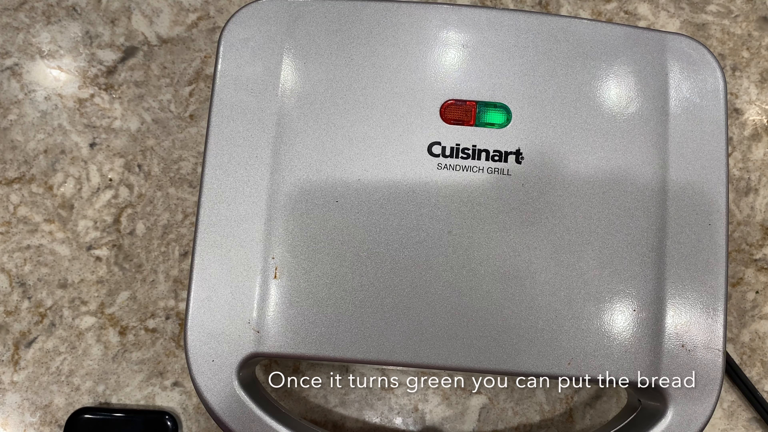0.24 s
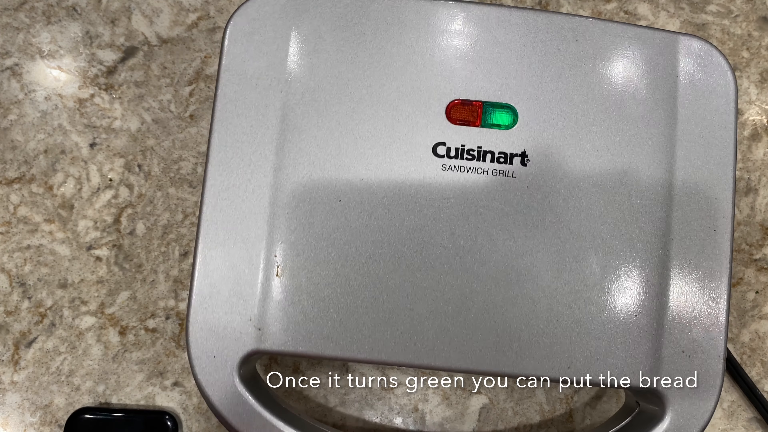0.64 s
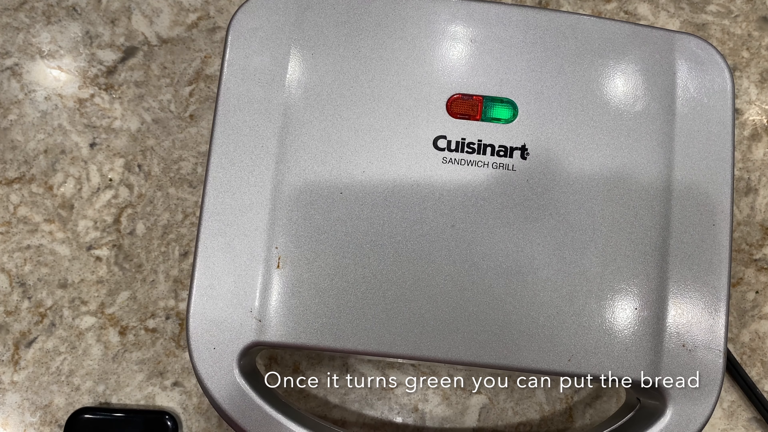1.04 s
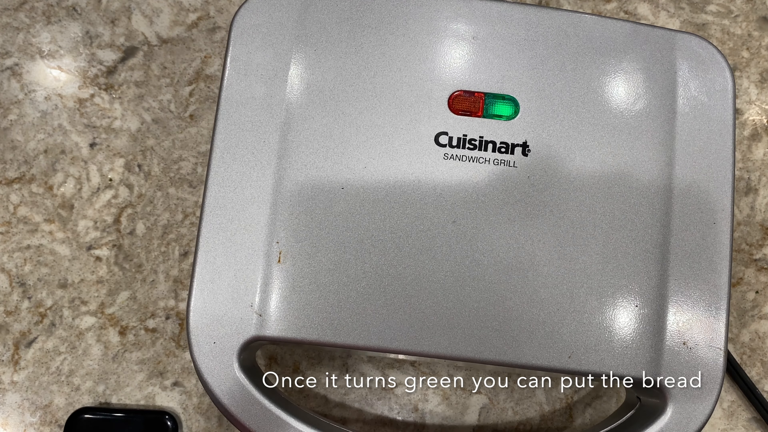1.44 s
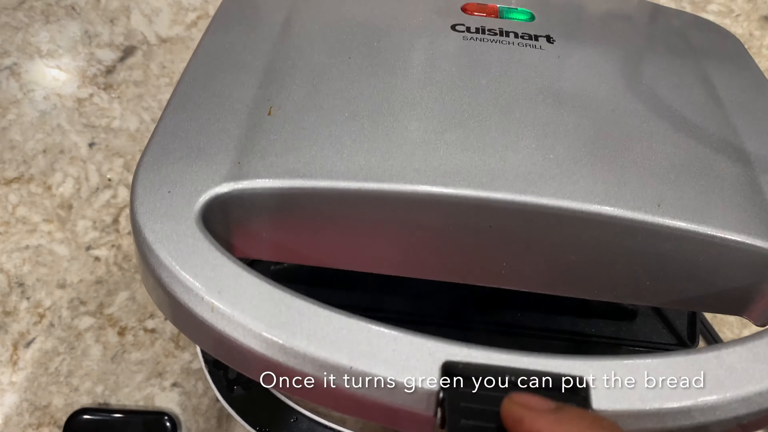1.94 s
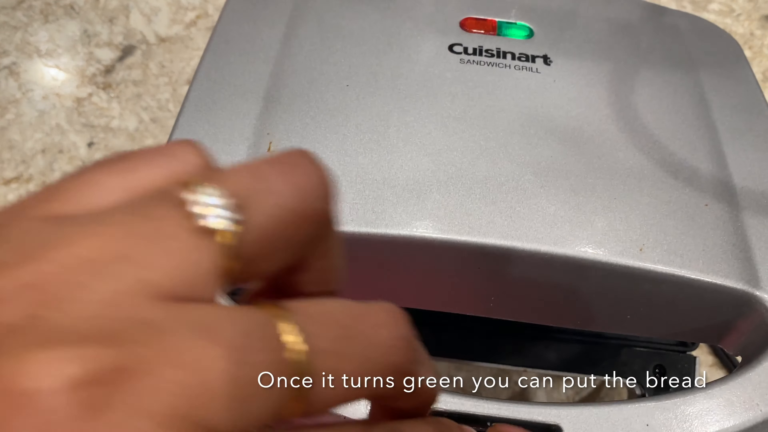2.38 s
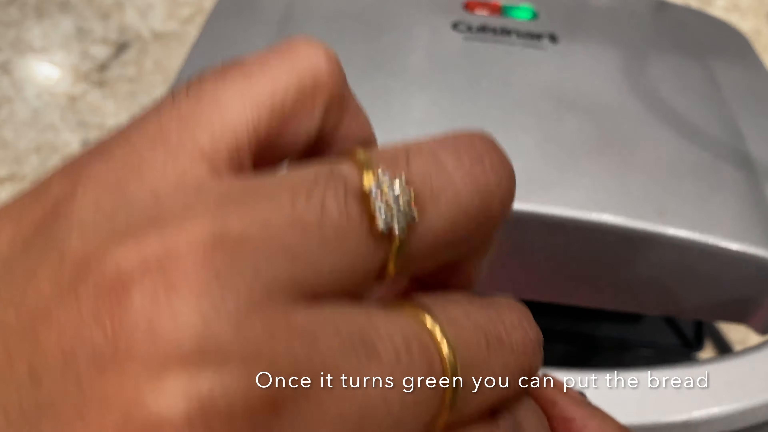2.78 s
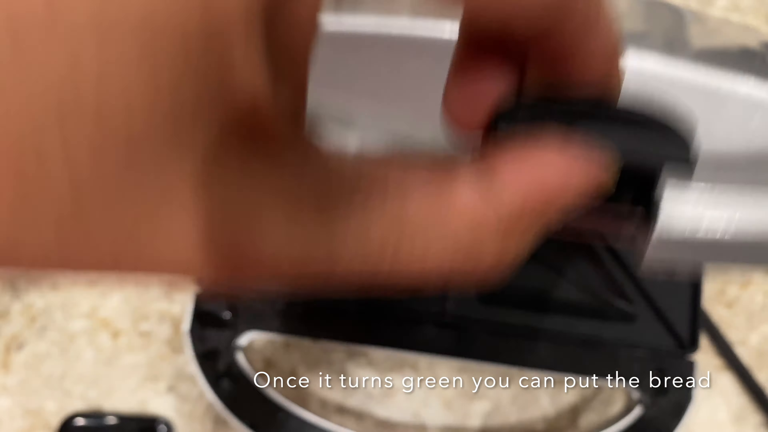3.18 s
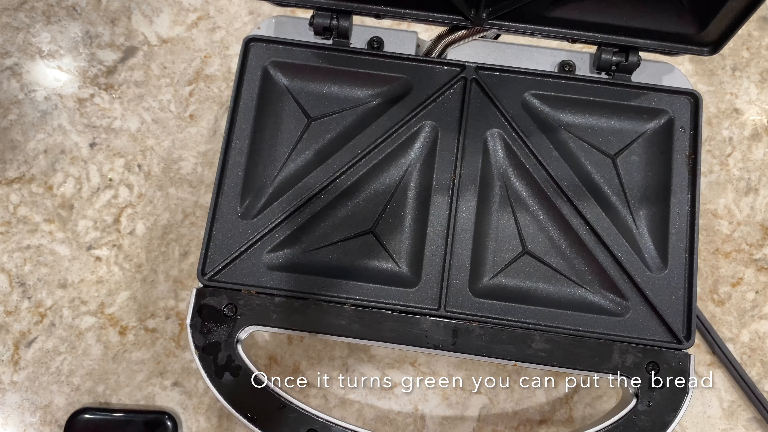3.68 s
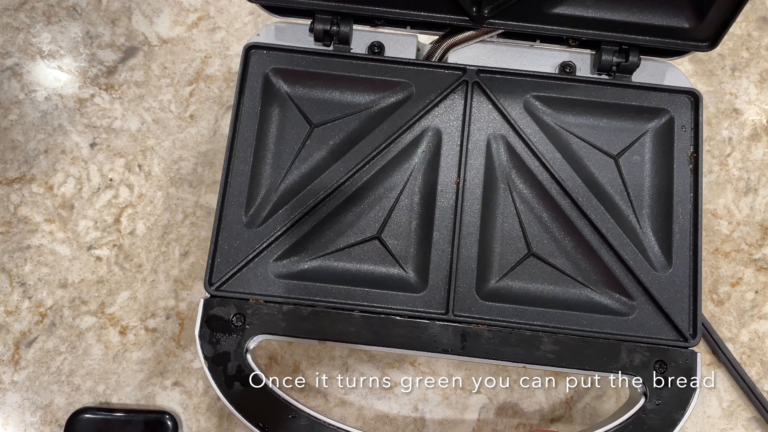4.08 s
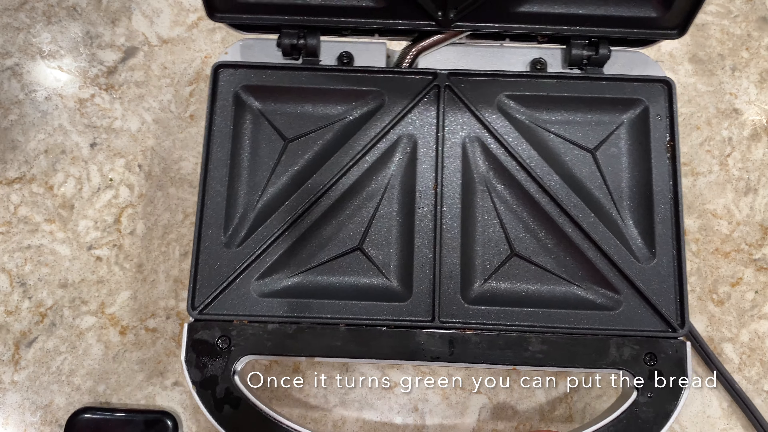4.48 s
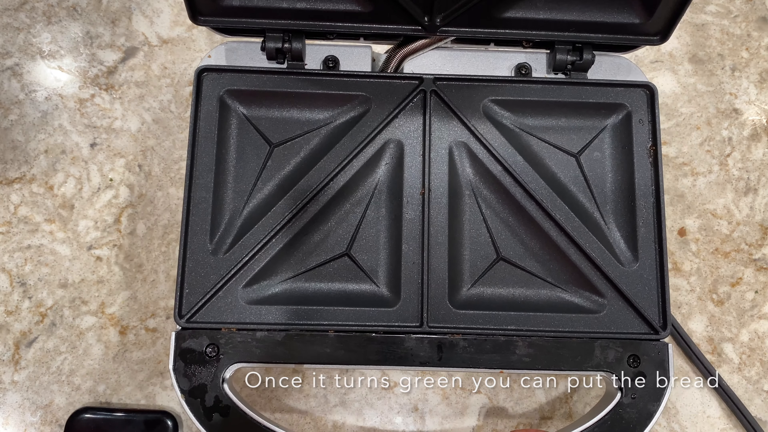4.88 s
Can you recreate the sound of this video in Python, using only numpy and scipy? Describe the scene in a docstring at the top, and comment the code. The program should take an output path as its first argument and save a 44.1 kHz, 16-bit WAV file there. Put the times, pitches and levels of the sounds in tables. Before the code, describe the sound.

Close stereo view of a sandwich grill on a stone counter in a small, hard kitchen. Quiet room noise and a low wavering hum, a couple of light rattles, then at half a second one loud, sharp plastic latch snap. The loose lid rattles for about a second. Faint hand brushing follows, then hinge and housing knocks with a soft thud as the lid opens and settles.

```python
"""Quiet room noise with a low wavering hum comes first, then finger scuffs and light rattles of a grill's lid.
The plastic latch of this sandwich grill snaps open on a stone counter, and the lid rattles on in its catch.
Then the lid is lifted, and its hinges and housing knock as it settles upright; a hand and sleeve brush past.
Blows are sums of fading tones plus noise bursts; rubbing and room noise are shaped noise.
Nearby surfaces echo the rattles and knocks, and a small hard kitchen rings behind it all."""
import sys
import numpy as np
from scipy import signal
from scipy.fft import rfft, irfft, next_fast_len
from scipy.io import wavfile
from scipy.ndimage import map_coordinates

SR = 44100
rng = np.random.default_rng(int(sys.argv[2]) if len(sys.argv) > 2 else 0)


def transcribe(signal):
    """Save signal, clipped to [-1, 1], as a 16-bit WAV file at the path in sys.argv[1]."""
    frames = np.atleast_2d(signal).T
    limited = np.clip(frames, -1, 1)
    pcm = np.round(limited * 32767).astype(np.int16)
    wavfile.write(sys.argv[1], SR, pcm)


N = 226094
T = np.arange(SR // 2) / SR  # half a second of time, for single sounds

# In these tables, t60/s is the time a sound takes to fade by 60 dB. Levels of tones and colours are relative.
# room noise over time: [t/s, level/dB]
AIR_LEVEL = [(0.0, -63.5), (0.2, -67), (0.45, -68), (0.7, -62), (1.76, -62), (3.11, -61.5), (3.77, -59.5),
             (4.44, -61.5), (5.13, -60.5)]
# how the room noise is spread over pitch: [f/Hz, level/dB]
AIR_COLOUR = [(20, -36), (50, -8.5), (100, -11.5), (165, -3), (250, -10.5), (400, -17.5), (700, -18),
              (1100, -31), (2000, -39), (3500, -44.5), (7000, -48), (13000, -54.5)]
# how alike left and right are in spread-out sound: [f/Hz, likeness from -1 to 1]
LEFT_RIGHT_LIKENESS = [(100, 0.99), (300, .85), (700, 0.31), (2000, .2), (7000, -0.098), (13000, -.6)]
# fingers scuffing the lid and handle: [start t/s, level/dB, length/s, centre f/Hz]
SCUFFS = [(.02, -72.5, 0.086, 1340), (1.841, -58.5, 0.076, 4800), (2.51, -71, .12, 1800),
          (2.661, -74, 0.073, 1895), (2.919, -75, 0.064, 1587), (3.039, -68, 0.077, 4390),
          (3.188, -73.5, .12, 1897), (3.837, -67.5, 0.028, 1403), (3.884, -73, .022, 1500),
          (5.085, -73, .07, 1193)]
# lid rattling in its catch: [t/s, level/dB, low edge f/Hz, brightness/dB per octave, panel f/Hz, panel level/dB]
RATTLES = [(.253, -51, 510, -9.5, 485, -41.5), (.447, -42, 650, -7, 547, -46.5),
           (.529, -32, 520, 1, 510, -44), (.551, -40, 800, -6, 520, -53), (.563, -37, 700, -9, 610, -35),
           (.605, -34.5, 950, -21, 493, -41.5), (.658, -33.5, 890, -19, 499, -36.5),
           (.692, -52, 910, -8, 530, -62), (.751, -46.5, 626, -5, 503, -54.5),
           (.793, -59, 630, 3, 517, -54), (.836, -54.5, 590, 1, 516, -50.5),
           (.857, -44.5, 700, 1, 527, -49), (.863, -34.5, 682, 1, 537, -46),
           (.99, -60.5, 652, -10, 605, -50.5), (1.057, -39.5, 674, -2, 458, -48),
           (1.099, -42.5, 716, -2, 496, -52), (1.137, -48, 630, -7.5, 522, -53),
           (1.226, -40.5, 594, -9, 481, -37), (1.273, -49.5, 560, -11, 493, -51),
           (1.293, -41.5, 760, 4, 529, -36.5), (1.305, -45.5, 566, -2, 529, -40),
           (1.331, -39, 900, -9, 458.6, -37), (1.366, -46.5, 582, -2, 506, -43),
           (1.517, -37.5, 752.5, -1.5, 452, -27.5), (1.58, -55.5, 720, -3.5, 473, -43)]
# tones of the closed shell: [f/Hz, level/dB, t60/s]
SHELL_TONES = [(680, -2, .045), (962, 0, .04), (1130, -5, .03), (1545, -9, .035), (1810, -11, .03),
               (2085, -7, .035), (2400, -17, .024), (3020, -19, .05)]
# noisy edge of each rattle and knock: [f/Hz, level/dB]
CONTACT_COLOUR = [(150, 6.5), (600, 13.0), (2000, 10.0), (2600, 4.5),
                  (4500, -6.5), (7000, -6.5), (9000, -10), (14000, -18.5)]
# strokes of hand and sleeve: [t/s at the height, hiss level/dB, dull rub over the hiss/dB, length/s]
STROKES = [(0.341, -82.5, -3, 0.17), (0.869, -69.5, 19.5, 0.041), (.928, -64, 10, 0.017),
           (1.1, -68.5, 6.5, 0.088), (1.273, -68.5, 1, 0.084), (1.682, -77.5, -1, 0.14),
           (1.875, -56, -17, 0.072), (2.37, -78.5, 9.5, 0.048), (2.527, -77, 8, 0.17),
           (2.699, -74, 6.5, 0.05), (2.914, -74.5, 2.5, 0.023), (3.068, -69, -6, 0.036),
           (3.12, -70.5, 2.5, 0.15), (3.562, -78, -12, 0.098), (3.886, -76.5, -0.5, 0.053),
           (3.975, -69, -24, 0.063), (4.738, -73, -23, 0.13), (4.943, -88, 10, 0.015),
           (5.037, -89, 15, 0.019)]
# colour of the dull rub: [f/Hz, level/dB]
RUB_COLOUR = [(300, 7.5), (700, 9.5), (1300, 7), (1750, 15), (2400, 2), (3100, -1), (4500, -25.5),
              (9000, -11.5)]
# colour of the hiss: [f/Hz, level/dB]
HISS_COLOUR = [(1200, -19), (2500, -5), (3700, -4), (4100, 0), (5000, -6.5), (6400, 0.5), (8000, -5),
               (10000, -3.5), (12400, -8), (13500, -13.5)]
# small dry ticks of plastic: [t/s, level/dB]
TICKS = [(0.4988, -29), (.864, -65), (1.292, -56), (1.7953, -40.5), (2.1296, -62.5), (2.915, -67),
         (3.4617, -50), (3.6589, -41), (4.952, -59)]
# colour of a tick: [f/Hz, level/dB]
TICK_COLOUR = [(1000, -15), (3000, -14.5), (7000, -5.5), (12000, -5.5), (15000, -1.5)]
# catch snapping free, then the lid jumping against it: [t/s, level/dB, lowest f/Hz, highest f/Hz, free ring/s]
SNAPS = [(0.499, -3.5, 648, 14800, .0083), (0.5053, -2.5, 359.5, 1133, .0011)]
# tones of the latch and handle, before the choke: [f/Hz, level/dB, t60/s]
LATCH_TONES = [(482, 4.3, .065), (631, -3, .044), (889, -9.5, .03), (1005, -4, .036), (1116, -.5, .031),
               (1425, -10.5, .04), (1720, -9.5, .03), (2095, 1.5, .045), (2215, -4.5, .022),
               (2400, -7, .026), (2859, -20, .018), (3560, -9.5, .026), (3950, -8, .016), (6100, -16, .02)]
# the latch's crack: [f/Hz, level/dB]
LATCH_CRACK_COLOUR = [(300, -26.5), (900, -7), (2500, -0.5), (4000, -7.5), (5000, -11), (7000, -6),
                      (10000, -18), (14000, -15)]
# the snap as it spreads into the room: [f/Hz, level/dB]
BURST_COLOUR = [(200, -20.5), (330, -16), (480, 3.5), (1100, 4.5), (1800, .5), (3300, -6.5), (4800, -17),
                (6500, -17), (9000, -23.5), (13000, -38.5)]
# dull bumps of the grill's weight on the counter: [t/s, level/dB, pitch as a share of the usual]
BUMPS = [(0.5, -34.5, 1.86), (0.503, -32, 0.59), (1.883, -45, 0.53), (3.098, -39, 0.79), (3.523, -27, 1),
         (3.94, -41, 0.64), (4.311, -42, 0.84), (4.724, -35.5, 0.98)]
# tones of the grill on its feet: [f/Hz at the usual pitch, level/dB, t60/s]
FEET_TONES = [(79, -12.5, 0.23), (130, 4, 0.051), (210, -5, .07), (296, -9.5, 0.057)]
# jolts that reach the metal cooking plate: [t/s, level/dB]
JOLTS = [(.501, -44.5), (0.862, -59), (1.52, -64), (2.434, -73), (3.928, -67)]
# tones of the plate: [f/Hz, level/dB, t60/s]
PLATE_TONES = [(1534, -12, .14), (1814, -14, .12), (2907, -1, .17), (2985, -4, .26), (3100, -7, .14),
               (3540, -6, .18), (3890, -11, .15)]
# loose parts chattering after a jolt: [t/s, level/dB, length/s]
CHATTER = [(0.514, -32.5, 0.22), (0.87, -49, 0.12), (1.266, -47.5, 0.17), (2.508, -66, 0.18),
           (3.849, -60.5, 0.078)]
# gritty noise of one chatter touch: [f/Hz, level/dB]
GRIT_COLOUR = [(200, -22.5), (450, 4.5), (1100, 7), (2200, -3.5), (4000, -9), (7000, -18.5), (13000, -36.5)]
# hinge and housing knocks: [t/s, level/dB, low edge f/Hz, brightness/dB per octave, panel f/Hz, panel level/dB]
KNOCKS = [(2.074, -61, 942, -1.5, 460, -63.5), (2.281, -66, 509.3, -4.5, 451.7, -59.5),
          (2.376, -62, 600, -11, 459.3, -55.5), (2.435, -46.5, 755, 2.5, 462, -50.5),
          (2.511, -59.5, 967, -4, 466.4, -66), (2.566, -51, 835, -1.5, 470, -46.5),
          (2.715, -62.5, 600, 0.5, 457.6, -52.5), (3.36, -47, 519, -1.5, 565, -40),
          (3.516, -57, 1096, -4, 300.3, -59), (3.754, -66, 467, -11, 480, -44.5),
          (3.776, -64, 603, -8.5, 481, -53), (3.828, -44, 519, -10, 483, -34.5),
          (3.929, -41, 620, -1, 441, -36), (3.971, -42, 474, -6, 293, -34.5),
          (4.022, -47.5, 920, -10, 353, -61), (4.685, -39.5, 606, -1.5, 275, -40),
          (4.732, -43.5, 1237, -12, 454, -47.5), (4.937, -48.5, 720, -15, 322.5, -52.5),
          (5.039, -46, 787, -18.5, 300, -51)]
# tones of the open housing: [f/Hz, level/dB, t60/s]
HOUSING_TONES = [(610, -6, .02), (738, 1, .034), (1090, -5, .022), (1300, -9, .014), (1525, -2, .022),
                 (1770, -7, .018), (2100, -16, .016), (2440, -19, .016), (2830, -16, .032)]
# echoes off the counter and nearby surfaces: [delay t/s, level/dB]
ECHOES = [(.0038, -17), (0.0126, -15.5), (0.0171, -22.5), (.029, -27)]
# how long the kitchen rings at each pitch: [f/Hz, t60/s]
KITCHEN_T60 = [(60, 1), (200, 0.53), (600, 0.38), (2000, 0.81), (4000, 0.38), (8000, 0.44), (14000, 0.17)]
# how loudly the kitchen answers: [f/Hz, level/dB]
KITCHEN_LEVEL = [(60, -10.5), (300, -5.5), (700, -12), (2000, -17), (4000, -4.5), (12000, -15)]
# the two microphone ports are shaded differently: [f/Hz, left minus right/dB]
PORT_SHADE = [(60, -1), (110, 0), (200, 0.5), (330, -0.8), (500, 1.4), (660, 3.5), (1210, 1), (2210, -1.5),
              (4020, -5), (7330, 0), (13400, 1.5)]

HUM_HZ, HUM_DB = 156, -2.5  # an appliance's tone; its level goes with the room noise
SLIPS_PER_S, SCUFF_Q = 2500, 1.1  # how densely skin catches; how narrow the rubbed part's resonance is
CONTACT_Q, BRIGHT_FROM_HZ = 1.2, 990  # how sharply a contact picks its ring; where hardness starts to count
PANEL_DELAY_S, PANEL_ATTACK_S = .002, 0.00053  # the broad panel starts to swing after the contact
PANEL_FREE_S, PANEL_DAMP_DB = .026, -9  # the panel swings freely, then is damped
RISE_SHARE = 0.43  # the part of a stroke spent swelling
GRIP_DB, GRIP_KNOTS_PER_S = 3.8, 120  # depth and rate of catching and slipping in the rub
GRAIN_DB, GRAIN_KNOTS_PER_S = 3.6, 130  # the same in the hiss
SNAP_ATTACK_S = 0.00051  # the catch takes a moment to slide off its lip
SEAT_DB = -12.5  # the handle lands on its seat soon after each blow, which chokes its ring
SHUDDER_HZ, SHUDDER_RELATIVE_DB, SHUDDER_S = 54, -53.5, 0.24  # the grill keeps rocking after the snap
CHATTER_FADE_DB, CHATTER_SPREAD_DB = 22, 10  # loss over one bout; range of sizes
CHATTER_RING_DB = -5  # the shell under the grit
TOP_HZ = 14000


def amp(db):
    """Turn decibels into a gain."""
    return 10 ** (np.asarray(db) / 20)


def unit(x):
    """Scale to an average strength (rms) of 1."""
    return x / np.sqrt(np.mean(x ** 2) + 1e-20)


def along(points, hz):
    """Read values between (Hz, value) points on a log pitch axis."""
    f, v = np.transpose(points)
    return np.interp(np.log(hz + 1), np.log(f), v)


def curve(rows, **ends):
    """Turn (s, value) rows into one value per sample."""
    return np.interp(np.arange(N) / SR, *np.transpose(rows), **ends)


def wobble(rate):
    """A smooth random curve with rate random points a second."""
    knots = rng.standard_normal(int(N * rate / SR) + 4)
    return map_coordinates(knots, [np.arange(N) * rate / SR])


def filtered(x, response):
    """Change the strength and timing of each pitch in x by a response to frequency."""
    n = x.shape[-1]
    m = next_fast_len(n + 8192)  # room for the tail
    return irfft(rfft(x, m) * response(np.fft.rfftfreq(m, 1 / SR)), m)[..., :n]


def add(track, s, sound):
    """Mix a sound in at time s."""
    part = track[round(s * SR):][:len(sound)]
    part += sound[:len(part)]


def spread(hz):
    """Shares of middle and side sound that give the wanted left-right likeness."""
    turn = np.arccos(np.clip(along(LEFT_RIGHT_LIKENESS, hz), -1, 1)) / 2
    return np.array([np.cos(turn), np.sin(turn)])


def noise(colour):
    """Spread-out stereo noise of rms 1."""
    raw = rng.standard_normal((2, N))
    mid, side = filtered(raw, lambda hz: amp(along(colour, hz)) * spread(hz))
    return unit(np.array([mid + side, mid - side]))


def ring(tones, scatter_db, detune):
    """A struck part sounds as fading tones, with strengths and pitches a little different each time."""
    out = np.zeros(len(T))
    for hz, db, t60 in tones:
        level_chance, pitch_chance = rng.standard_normal(2)
        fade = amp(db + scatter_db * level_chance - 60 * T / t60)
        out += fade * np.sin(2 * np.pi * hz * (1 + detune * pitch_chance) * T)
    return out


def crack(colour, t60):
    """A burst of fading noise stands for countless short-lived tones."""
    burst_noise = unit(filtered(rng.standard_normal(len(T)), lambda hz: amp(along(colour, hz))))
    return burst_noise * amp(-60 * T / t60)


def radiated(x, cut_hz):
    """Small parts give off little bass."""
    return filtered(x, lambda hz: (1j * hz) ** 2 / (cut_hz ** 2 - hz ** 2 + 1j * hz * cut_hz))


def dispersed(x, delay, knee_hz):
    """The bass trails the treble by up to delay seconds, so each click drops in pitch."""
    return filtered(x, lambda hz: np.exp(-2j * np.pi * delay * knee_hz * np.arctan(hz / knee_hz)))


def background():
    """Low room noise drifts in level under a wavering appliance hum."""
    phase = 2 * np.pi * HUM_HZ * np.arange(N) / SR + .5 * wobble(5)
    hum = np.sin(phase) * amp(2 * wobble(5))
    air = amp(.8 * wobble(9)) * noise(AIR_COLOUR)
    return amp(curve(AIR_LEVEL)) * (air + amp(HUM_DB) * hum)


def scuffs():
    """Fingers drag on the lid: a swell of tiny slips, pitched by the part that they rub."""
    out = np.zeros(N)
    for s, db, length, centre_hz in SCUFFS:
        slips = rng.standard_normal(len(T)) * (rng.random(len(T)) < SLIPS_PER_S / SR)

        def resonance(hz):
            through = 1j * hz * centre_hz
            return (through / (SCUFF_Q * (centre_hz ** 2 - hz ** 2) + through)) ** 2

        rubbed = unit(filtered(slips, resonance))
        swell = np.sin(np.pi * np.clip(T / length, 0, 1))
        add(out, s, amp(db) * rubbed * swell)
    return out


def voiced(blow, db, ring_hz, brightness_db, span):
    """The point of contact picks the low ring, its hardness the treble; db is the rms over span seconds."""
    def contact(hz):
        picked = (1j * hz) ** 2 / (ring_hz ** 2 - hz ** 2 + 1j * hz * ring_hz / CONTACT_Q)
        octaves = np.log2(np.clip(hz, BRIGHT_FROM_HZ, 7000) / BRIGHT_FROM_HZ)
        return picked * amp(brightness_db * octaves)

    blow = filtered(blow, contact)
    return amp(db) * blow * np.sqrt(span * SR) / np.linalg.norm(blow)


def contacts(events, tones, crack_db, crack_t60, delay, span, lead, detune, scatter_db, panel_t60):
    """Light blows of plastic ring the same tones at new strengths, over a hollow panel note that shifts."""
    out = np.zeros(N)
    attack = 1 - np.exp(-T / .0006)
    swing = (1 - np.exp(-T / PANEL_ATTACK_S)) * amp(-60 * T / panel_t60)
    swing *= amp(PANEL_DAMP_DB * np.clip((T - PANEL_FREE_S) / .006 + .5, 0, 1))
    for s, db, ring_hz, brightness_db, panel_hz, panel_db in events:
        edge = crack(CONTACT_COLOUR, crack_t60)
        blow = (ring(tones, scatter_db, detune) + amp(crack_db) * edge) * attack
        blow = dispersed(radiated(blow, cut_hz=170), delay, knee_hz=900)
        # start early by lead seconds, as the lower pitches come late
        add(out, s - lead, voiced(blow, db, ring_hz, brightness_db, span))
        panel = swing * np.sin(2 * np.pi * panel_hz * T)
        add(out, s + PANEL_DELAY_S, amp(panel_db) * panel)
    return out


def rattles():
    """The loose lid taps in its catch and rings the closed shell."""
    return contacts(RATTLES, SHELL_TONES, crack_db=3, crack_t60=0.033, delay=0.003, span=0.008,
                    lead=0.00087, detune=0.012, scatter_db=2.5, panel_t60=.08)


def brushing():
    """Skin and cloth slide in uneven strokes that swell quickly and trail away."""
    t = np.arange(N) / SR
    power = np.zeros((2, N))  # the rub, then the hiss
    for s, hiss_db, rub_db, length in STROKES:
        rise, fall = RISE_SHARE * length, (1 - RISE_SHARE) * length
        distance = np.where(t < s, (s - t) / rise, (t - s) / fall)
        power += amp([[hiss_db + rub_db], [hiss_db]]) ** 2 * np.exp(-2 * distance ** 2)
    rub, hiss = np.sqrt(power)
    grip = amp(GRIP_DB * wobble(GRIP_KNOTS_PER_S))
    grain = amp(GRAIN_DB * wobble(GRAIN_KNOTS_PER_S))
    return rub * grip * noise(RUB_COLOUR) + hiss * grain * amp(3.5) * noise(HISS_COLOUR)


def ticks():
    """Tiny slips of plastic are too brief to ring the shell."""
    out = np.zeros(N)
    for s, db in TICKS:
        add(out, s, amp(db) * crack(TICK_COLOUR, t60=0.028))
    return out


def latch():
    """The catch slips off its lip: the handle rings under a sharp crack, then clunks onto its seat."""
    out = np.zeros(N)
    attack = 1 - np.exp(-T / SNAP_ATTACK_S)
    for s, db, low_hz, high_hz, free_s in SNAPS:
        choke = amp(SEAT_DB * np.clip((T - free_s) / .002 + .5, 0, 1))
        handle = choke * ring(LATCH_TONES, scatter_db=1, detune=0.0027)
        blow = amp(-7.0) * handle + amp(-13.5) * crack(LATCH_CRACK_COLOUR, t60=0.033)
        blow = radiated(attack * blow, low_hz)
        # the softer the contact, the less treble it wakes
        blow = filtered(blow, lambda hz: (1 + (hz / high_hz) ** 8) ** -.5)
        add(out, s, amp(db) * blow)
    return dispersed(radiated(out, cut_hz=660), delay=0.0086, knee_hz=577)


def burst():
    """The whole lid passes the snap on to the room as one short push."""
    push = np.zeros(N)
    push[round(SNAPS[0][0] * SR)] = 1
    push = filtered(push, lambda hz: amp(along(BURST_COLOUR, hz)))
    return amp(10.5) * push / np.linalg.norm(push)


def bumps():
    """Soft, heavy contacts give only a low thud; the snap also leaves the grill rocking."""
    out = np.zeros(N)
    attack = 1 - np.exp(-T / 0.0025)
    for s, db, pitch in BUMPS:
        tones = np.array(FEET_TONES) * [pitch, 1, 1]
        add(out, s, amp(db) * attack * ring(tones, scatter_db=0.85, detune=0.0067))
    rocking = np.sin(2 * np.pi * SHUDDER_HZ * T) * np.exp(-(T / SHUDDER_S) ** 6)
    add(out, SNAPS[0][0], amp(SHUDDER_RELATIVE_DB) * attack * rocking)
    return amp(-0.5) * dispersed(radiated(out, cut_hz=60), delay=.035, knee_hz=94.3)


def plate():
    """The metal plate sings on faintly after a few of the blows."""
    out = np.zeros(N)
    for s, db in JOLTS:
        add(out, s, amp(db) * ring(PLATE_TONES, scatter_db=3.5, detune=.003))
    return out


def chatter():
    """After a jolt the loose parts touch many times at a few points, on the whole ever more lightly."""
    out = np.zeros(N)
    for s, db, length in CHATTER:
        for touches in rng.random((5, 8, 2)):  # five points, eight touches each
            shell = ring(SHELL_TONES, scatter_db=3.5, detune=.015)
            touch = crack(GRIT_COLOUR, t60=.018) + amp(CHATTER_RING_DB) * shell
            for when, size in touches:
                touch_db = db - CHATTER_FADE_DB * when - CHATTER_SPREAD_DB * size
                add(out, s + when * length, amp(touch_db) * touch)
    return out


def knocks():
    """Hinges and housing knock as the lid swings, and ring the open housing."""
    return contacts(KNOCKS, HOUSING_TONES, crack_db=-1, crack_t60=.027, delay=.0022, span=.0084,
                    lead=.0006, detune=.015, scatter_db=2, panel_t60=.05)


def echoed(x):
    """Nearby hard surfaces repeat each knock."""
    out = x.copy()
    for s, db in ECHOES:
        add(out, s, amp(db) * x)
    return out


def kitchen(x):
    """Hard walls answer with a swell over a few milliseconds, then each pitch fades at its own pace."""
    hz, t, z = signal.stft(rng.standard_normal((2, SR * 3 // 4)), SR, nperseg=256)
    fade = amp(-60 * t / along(KITCHEN_T60, hz)[:, None]) * np.clip(t / 0.025, 0, 1)
    strength = np.sqrt(np.mean(fade ** 2, axis=1) * t[-1] * SR)
    fade *= (amp(along(KITCHEN_LEVEL, hz)) / strength)[:, None]
    mid, side = signal.istft(z * fade * spread(hz)[:, :, None], SR, nperseg=256)[1]
    answer = np.array([mid + side, mid - side])
    return signal.fftconvolve(x[None], answer, axes=1)[:, :N]


def ports(x, lag):
    """Sound reaches the left microphone port lag seconds before the right, and is shaded differently."""
    def heard(side):
        return filtered(x, lambda hz: amp(side * along(PORT_SHADE, hz) / 2) * np.exp(1j * np.pi * hz * lag * side))

    return np.array([heard(1), heard(-1)])


def scene():
    """The grill sounds in front of the microphones, in its room."""
    snap = latch()
    handling = echoed(rattles() + knocks()) + scuffs() + ticks() + bumps() + plate() + chatter()
    # the handle rings right by the microphones and puts little into the room
    room = kitchen(handling + amp(-9.0) * snap + burst())
    return ports(snap + handling, lag=3.6e-5) + room + brushing() + background()


def record(dry):
    """A steep filter removes what lies above the top frequency."""
    return filtered(dry, lambda hz: 1 / (1 + (hz / TOP_HZ) ** 60))


dry = scene()
out = record(dry)
transcribe(out)
```